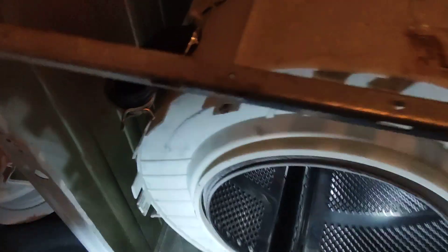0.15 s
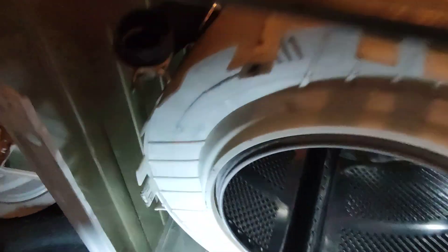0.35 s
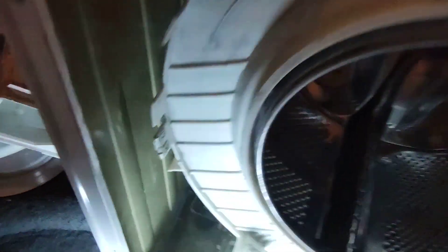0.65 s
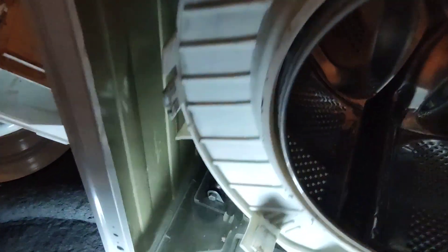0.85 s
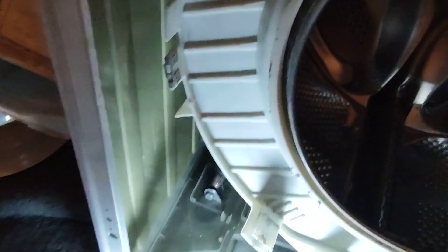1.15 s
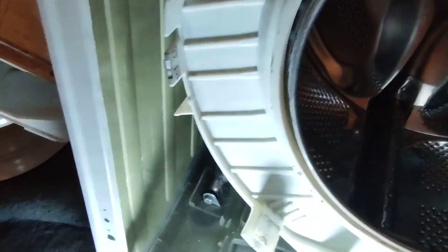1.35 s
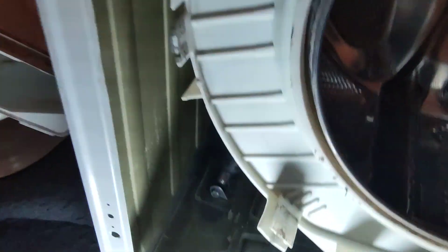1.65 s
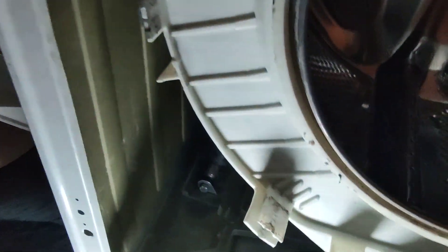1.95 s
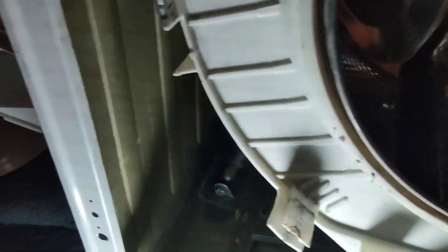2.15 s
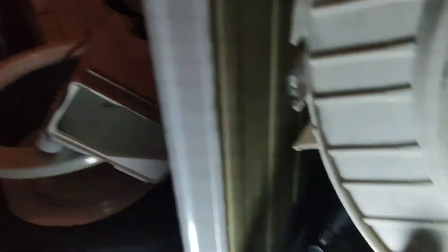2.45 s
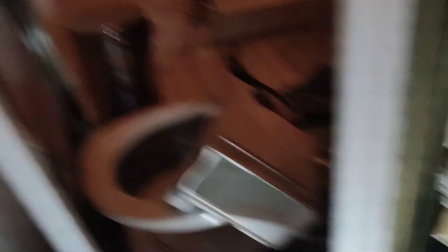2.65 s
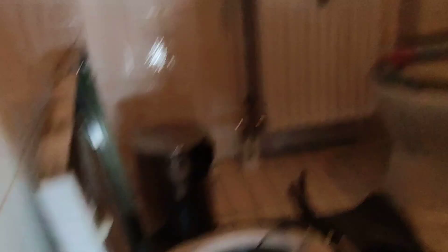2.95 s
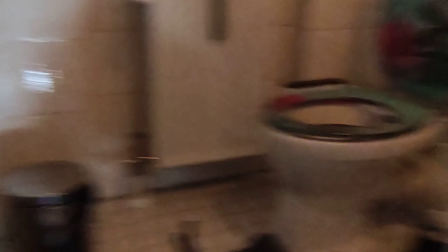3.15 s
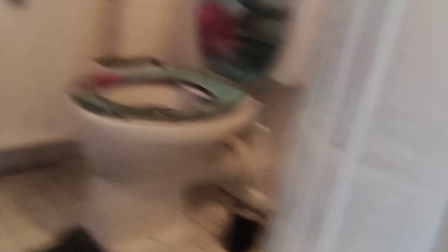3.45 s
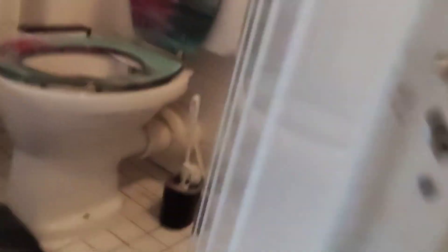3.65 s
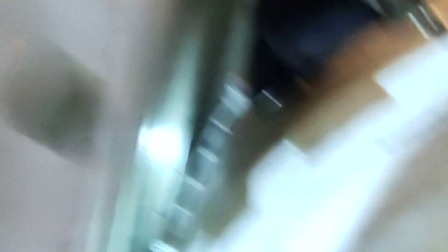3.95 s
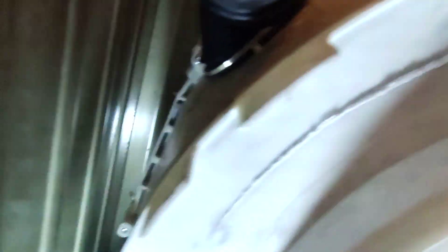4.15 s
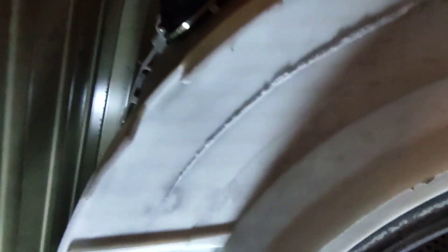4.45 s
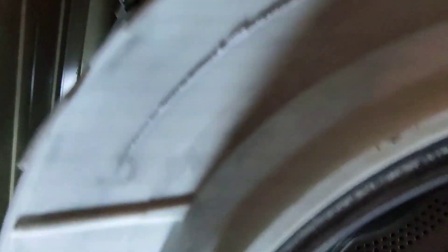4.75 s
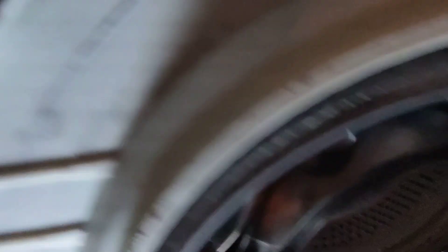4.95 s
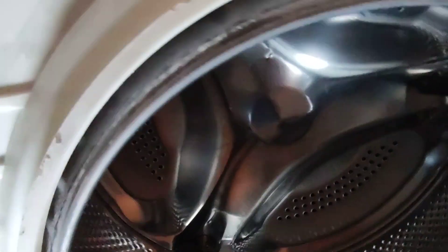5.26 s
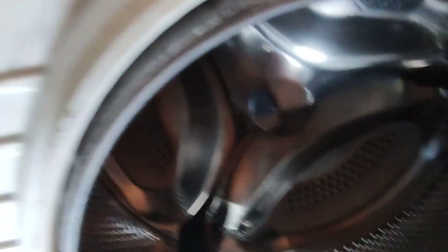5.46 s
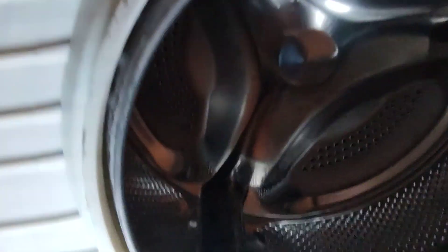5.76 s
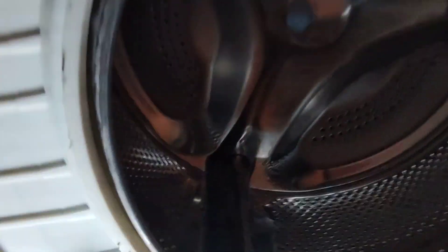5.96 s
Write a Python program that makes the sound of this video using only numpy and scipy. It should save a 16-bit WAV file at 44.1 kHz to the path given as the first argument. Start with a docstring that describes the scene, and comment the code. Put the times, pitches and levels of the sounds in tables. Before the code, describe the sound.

Close to the microphone, an opened washing machine is knocked and shoved in a small tiled bathroom. Two bright clicks come first, then a scraping, squealing cluster of hollow clunks, a double clunk, and a quieter gap. The loudest hard crack follows with a low puff of air, then looser knocks, a tiny metallic tinkle, and a final run of dull clunks. Short bright reverberation, soft rumble and hiss.

```python
"""Hard parts click on the steel cabinet of an opened washing machine, close by in a small tiled bathroom:
noisy chatter sets cabinet and tub ringing. The hollow tub clunks in damped swings and rocks in slow puffs
of air; random slips make scrapes, faint hissing swells (perhaps a sleeve rustling) and judder, narrow noise
makes squeals, and a small loose piece tinkles. A short, bright noise tail is the room, over rumble and hiss.
Table levels come before the layer and mix gains."""
import sys
import numpy as np
from scipy import signal
from scipy.fft import rfft, irfft
from scipy.io import wavfile

SR = 44100
rng = np.random.default_rng(int(sys.argv[2]) if len(sys.argv) > 2 else 0)


def generate_wav(signal):
    """Clip the signal to [-1, 1] and save it as 16-bit WAV at the path in sys.argv[1]."""
    frames = np.transpose(np.atleast_2d(signal))
    scaled = np.clip(frames, -1, 1) * 32767
    pcm = np.round(scaled).astype(np.int16)
    wavfile.write(sys.argv[1], SR, pcm)


N = 268877
SIZE = 32768  # samples in one short sound or response
T, HZ = np.arange(SIZE) / SR, np.fft.rfftfreq(SIZE, 1 / SR)

# spectrum of surfaces touching: (frequency [Hz], level [dB])
CONTACT_SPECTRUM = [(40, 1), (300, -5), (800, -2.5), (1300, -2), (2100, 1), (3200, -3), (4800, -5.5),
                    (6200, -7.5), (7400, -8), (8400, -16), (10000, -23.5), (12500, -33.5), (16000, -33)]


def clicks(bass_hz=600, mid_hz=2300, treble_hz=7000, top_hz=12000, top_growth=2.0, part_db=6.0,
           part_octaves=0.47, ripple_db=3.0, ripple_hz=80, chatter_db=2, first_db=10, tub_db=-3):
    """Each hard contact chatters for milliseconds and sets cabinet, tub and room ringing."""
    # hard contacts: (time [s], energy [dB], bass [dB], treble [dB], pitch of the part [Hz],
    # chatter decay [s], room [dB], steel ring [dB], left over right [dB])
    contacts = [(.769, -7.5, -19, 4, 2900, 0.0017, -6.5, -18, 1),
                (0.9305, -2, -14, 7, 3080, 0.0029, -5.5, -31, 1.5),
                (1.353, -29.5, -19, 5, 2750, .01, 5, 0, -4), (1.398, -24, 21, 7, 5600, .008, -2, 1, -3),
                (1.474, -16.5, -4, 5.5, 1870, 0.006, 1, 4, -1.5),
                (1.836, -19.5, 2, -7, 2240, 0.0043, 6.5, 1.5, 1.5),
                (1.8508, -12, -3.5, 2.5, 4840, 0.027, 8.5, 8.5, 0),
                (2.226, -13, 7.5, -1.5, 2400, 0.0011, -1.5, -27, -0.5),
                (2.236, -6.5, 12, -24, 1510, 0.017, -2.5, -40, -0.5),
                (3.3876, -18, 0, 8.5, 1770, 0.0048, 4, 0.5, -0.5),
                (3.893, -15.5, 5, -5, 1420, .003, 2, -13, 0),
                (4.041, -24.5, -1.5, -17, 2060, 0.012, 9, -5, 0),
                (4.201, -5.5, -8.5, 0, 1700, 0.015, 0.5, 3, -4),
                (4.2048, 4, -9.5, 2.5, 2300, 0.0062, -2.5, -19, 5.5),
                (4.228, -8, 2.5, 4, 2880, 0.0067, 6, -25, -1.5),
                (4.4912, -31.5, 3, -16, 1730, 0.00092, 5, -17, -8),
                (4.526, -20.5, -10, -23, 850, 0.0033, 3.5, -24, 1),
                (4.69, -8, -6.5, -11, 2570, 0.0098, 5.5, -24, 0),
                (4.783, -17.5, 3.5, -5, 1440, 0.01, 5, -13, -2.5),
                (5.086, -14, -13, 5, 1960, 0.0095, 1, -6, -3), (5.14, -18, -24, 9, 7200, 0.016, -2, -7, 0),
                (5.661, -21, 2, 12, 1600, .014, -5, -21, -1),
                (5.706, -20, -8, -5, 1700, 0.0028, -3, -21, -2),
                (5.73, -16, -10, -2, 1480, 0.012, -1.5, -14, 0),
                (5.745, -18.5, -24, 1.5, 2050, 0.0044, -17, -25, -2),
                (5.827, -17, 2, 6.5, 2530, 0.011, -3, -22, 2),
                (5.971, -19.5, -16, -13, 2650, 0.0072, -15, -26, -2),
                (5.9983, -18, 19, -17, 795, 0.0018, -26, -25, 4)]
    out, hollow = np.zeros((2, N)), amp(tub_db) * tub()
    for s, db, bass_db, treble_db, hz, chatter_s, room_db, ring_db, pan_db in contacts:
        # the treble tilt grows towards the top
        tilt = [(bass_hz, bass_db), (mid_hz, 0), (treble_hz, treble_db), (top_hz, top_growth * treble_db)]
        hardness = read(tilt, HZ)
        # the small part has one main resonance among many irregular ones
        part = part_db / (1 + (np.log2((HZ + 1) / hz) / part_octaves) ** 2)
        ripple = ripple_db * np.interp(HZ / ripple_hz, np.arange(len(HZ)), rng.standard_normal(len(HZ)))
        tone = unit(colour(read(CONTACT_SPECTRUM, HZ) + hardness + part + ripple))

        chatter = np.tanh(pair(SIZE)) * uneven(SIZE, chatter_db, 0.00096) * np.exp(-T / chatter_s)
        # the first impact reaches each port within 16 samples
        chatter[[0, 1], rng.integers(0, 16, size=2)] += amp(first_db)
        crack = unit(convolve(chatter, tone))
        tail = amp(room_db) * convolve(room(), tone)
        sound = crack + convolve(crack, hollow) + tail + amp(ring_db) * steel()
        pan = amp([[pan_db / 2], [-pan_db / 2]])
        add(out, s, amp(db) * pan * sound)
    return out


def steel(t60=0.52, prompt_t60=0.18, prompt_db=6, spot_db=3):
    """The cabinet's ring: each struck spot favours other modes; a strong early decay leaves a longer ring."""
    # modes of the steel cabinet: (frequency [Hz], level [dB])
    cabinet_modes = [(1041, -6), (1410, -7), (1782, -4), (2020, -4), (2143, -3), (2186, -3), (2598, -1),
                     (2810, -3), (2880, -1), (3063, -3), (3262, -2), (3391, 0), (3596, -2), (3865, 0),
                     (4301, -7), (4490, -7), (4651, -4), (5010, -4), (5213, 1), (5625, -7), (5760, -7),
                     (5885, -4), (6165, -5), (6514, -8), (6896, -8), (7255, -4), (7637, -5)]
    ring = np.zeros((2, SIZE))
    for hz, db in cabinet_modes:
        gain = amp(db + spot_db * rng.standard_normal())
        ring += gain * np.sin(2 * np.pi * (hz * T + rng.random((2, 1))))
    decay = amp(-60 * T / t60) + amp(prompt_db - 60 * T / prompt_t60)
    return unit(ring * decay)


def clunks(room_db=-6, level_db=-2, contact_cycles=0.21):
    """The struck wall swings a few times, the whole tub jolts, and both set its hollow ringing."""
    # dull blows on the tub: (time [s], energy [dB], pitch of the struck wall [Hz],
    # thump of the whole tub [dB], tub ring [dB])
    blows = [(1.25, -14.5, 520, -0.5, -3.5), (1.352, -21, 307, -28, 13), (1.398, -12, 503, -13, 0),
             (1.47, -9.5, 386, -26, 3), (1.519, -18.5, 222.6, -23.5, 11.5), (1.848, -9.5, 177, -27, 0),
             (1.869, -7, 365, -10.5, 4), (1.88, -10.5, 367, -23, 4.5), (1.883, -7.5, 524, -24, -10),
             (1.906, -7.5, 164, -10, -23), (2.204, -4.5, 99.3, -27, 5), (2.229, -6.5, 379, 6, -3),
             (2.231, -10, 215, -11.5, 2.5), (2.241, -10, 845, -15, -12), (3.431, -17, 205, -25, -24),
             (3.771, -18.5, 72.5, -5, -21), (4.06, -24, 343, -15, 14), (4.128, -16, 364, -0.5, 5),
             (4.193, -3, 57, -9.5, -11), (4.21, -13, 344, -2, -3.5), (4.492, -22.5, 235, -6.5, 14),
             (4.523, -21, 710, 3.5, -4), (4.573, -10, 220, -10, -1), (4.576, -23, 624, -8, -2),
             (4.59, -10, 55, -17, -14), (4.705, -27, 540, -1.5, 17), (4.805, -12, 422, -21, 2.5),
             (4.821, -18, 580, 3.5, 11), (4.835, -15, 261, 4.5, 8), (5.782, -24, 470, 4.5, 6),
             (5.884, -23, 400, -6, 12.5), (5.924, -10, 181, -20, 1.5), (5.955, -11.5, 419, -18, -5),
             (5.98, -19, 640, 9, -3), (6.0, -16.5, 294, -6, 10.5), (6.071, -24, 114, -29, 15)]
    # spectrum of a dull blow: (frequency [Hz], level [dB])
    dull_spectrum = [(20, -2), (60, 13.5), (550, 6.5), (800, 4.5), (1300, -5), (3000, -20), (9000, -75)]
    wall_cycles = 2.88  # the wall dies away within a few swings, whatever its pitch
    thump_hz, thump_cycles = 106, 0.86
    out, dull, hollow = np.zeros((2, N)), colour(read(dull_spectrum, HZ)), tub()
    thump = unit(convolve(swing(thump_hz, thump_cycles, contact_cycles), dull))
    for s, db, hz, thump_db, ring_db in blows:
        wall = unit(convolve(swing(hz, wall_cycles, contact_cycles), dull))
        blow = wall + amp(thump_db) * thump
        echo = amp(room_db) * np.linalg.norm(blow) * unit(convolve(blow, room()))
        ring = amp(ring_db) * convolve(blow, hollow)
        add(out, s, amp(db + level_db) * (blow + ring + echo))
    return out


def swing(hz, cycles, contact_cycles):
    """A damped swing that builds up over the contact; both times are counted in cycles of its pitch."""
    build = 1 - np.exp(-T * hz / contact_cycles)
    return np.sin(2 * np.pi * hz * T) * np.exp(-T * hz / cycles) * build


def tub():
    """The hollow tub's answer to a push; each mode peaks at its own level."""
    # modes of the tub: (frequency [Hz], peak gain [dB], t60 [s])
    tub_modes = [(69, 2, .4), (96.5, 10, .75), (113, 1, .5), (167, 4, .7), (210, 5, .45), (283, 2, .45),
                 (349.5, 8, .8), (410, 3, .6), (507, 4, .35), (558, 2, .35), (650, 4, .35), (732, 4, .45),
                 (1041, 12, .45)]
    response = np.zeros(SIZE)
    for hz, db, t60 in tub_modes:
        peak_scale = 2 * np.log(1000) / (t60 * SR)  # evens out the gain of short and long modes
        response += peak_scale * amp(db - 60 * T / t60) * np.cos(2 * np.pi * hz * T)
    return response


def tinks(room_db=-5):
    """A small loose metal piece is tapped and rings briefly with a few clear modes."""
    # taps: (time [s], energy [dB])
    taps = [(5.087, -15.5), (5.15, -30)]
    # modes of the piece: (frequency [Hz], level [dB], t60 [s])
    piece_modes = [(2520, -2, 0.15), (3470, -4, 0.2), (4124, -14, 0.24), (4872, -3, 0.13)]
    out = np.zeros((2, N))
    for s, energy_db in taps:
        ring = np.zeros((2, SIZE))
        for hz, db, t60 in piece_modes:
            ring += amp(db - 60 * T / t60) * np.sin(2 * np.pi * (hz * T + rng.random((2, 1))))
        ring = unit(ring)
        tail = amp(room_db) * unit(convolve(ring, room()))
        add(out, s, amp(energy_db) * (ring + tail))
    return out


def rubbing(slips_per_s=2500, spread_db=2.0, split_hz=4000, room_db=0, level_db=-4,
            rise_share=0.31, release_s=0.11):
    """Surfaces rub: tiny slips of uneven size make scrapes on the cabinet and faint, slow, hissing swells,
    perhaps a sleeve rustling."""
    # strokes: (start [s], length [s], level [dB], treble [dB], steel ring [dB])
    rubs = [(0.153, 0.68, -59.5, -0.5, -30), (1.188, 0.096, -59, -3, -4.5), (1.308, 0.091, -61, 9, 2.5),
            (1.495, 0.5, -57, -3.5, -21), (2.463, 0.64, -62, 2.5, -16), (4.003, 0.2, -49.5, -24, -29),
            (4.407, 0.21, -50.5, -28, -37), (5.344, 0.26, -59, -0.5, -27), (5.598, 0.13, -54, 8, -22),
            (5.886, 0.027, -46.5, 0, -25), (5.975, 0.17, -72, -6, -10)]
    starts, lengths, db, treble_db, ring_db = np.transpose(rubs)
    body = strokes(starts, lengths, db, rise_share, release_s)
    treble = strokes(starts, lengths, db + treble_db, rise_share, release_s)
    ring = strokes(starts, lengths, db + ring_db, rise_share, release_s)

    sizes = amp(spread_db * np.minimum(rng.exponential(1, N), 4))
    slips = (rng.random(N) < slips_per_s / SR) * sizes
    slips = slips * uneven(N, spread_db=1.5, hold_s=0.0046)  # the slips come in clumps
    slips = np.sqrt(N) * unit(slips * rng.standard_normal((2, N))) * amp(level_db)

    grit = convolve(slips, unit(colour(read(CONTACT_SPECTRUM, HZ))))
    low = signal.sosfilt(signal.butter(1, split_hz, fs=SR, output="sos"), grit)
    rub = body * low + treble * (grit - low) + convolve(ring * slips, steel())
    return rub + amp(room_db) * convolve(rub, room())


def judder(slips_per_s=260, level_db=-1, tub_db=-5, room_db=-5, rise_share=0.26, release_s=0.07):
    """A shove drags the tub over its supports: slow, soft slips push on its wall one after another."""
    # shoves: (start [s], length [s], level [dB])
    shoves = [(0.53, 0.51, -67.5), (1.222, 0.038, -49), (1.326, .22, -51.5), (1.836, 0.075, -40),
              (1.96, .16, -69), (3.9, 0.35, -59), (4.056, 0.16, -55), (4.466, 0.12, -48.5), (4.7, .15, -52),
              (5.596, 0.25, -58), (5.876, 0.1, -45.5), (5.98, .12, -56)]
    # spectrum of the pushed wall: (frequency [Hz], level [dB])
    wall_spectrum = [(20, -31), (70, -7), (130, -18.5), (220, 0), (380, -2), (560, -11), (720, -14.5),
                     (900, -13.5), (1500, -35.5), (4000, -61)]
    slips = (rng.random(N) < slips_per_s / SR) * rng.uniform(-0.93, 1, N)
    slips = np.sqrt(N) * unit(slips)
    slips = slips * amp(level_db) * strokes(*np.transpose(shoves), rise_share, release_s)
    wall = convolve(slips, unit(colour(read(wall_spectrum, HZ))))
    return wall + amp(tub_db) * convolve(wall, tub()) + amp(room_db) * convolve(wall, room())


def strokes(starts, lengths, levels_db, rise_share, release_s):
    """Force of a series of strokes: each builds over a share of its length, holds, and dies away."""
    t, power = np.arange(N) / SR, np.zeros(N)
    for start, length, db in zip(starts, lengths, levels_db):
        rise = np.clip((t - start) / (rise_share * length), 0, 1)
        release = np.exp(-np.clip((t - start - length) / release_s, 0, 20))
        power += (amp(db) * rise * release) ** 2
    return np.sqrt(power)


def squeals():
    """Rubbed metal squeals thinly: slips lock onto one resonance, a narrow noise that swells and fades."""
    # squeals: (time of the loudest point [s], half length [s], frequency [Hz], width [Hz], level [dB])
    squeal_list = [(1.273, 0.056, 5780, 50, -70), (1.276, 0.028, 1390, 14, -61),
                   (1.291, 0.049, 2680, 31, -62), (1.298, 0.07, 3420, 14, -60),
                   (1.341, 0.026, 7450, 60, -71), (1.376, 0.053, 4910, 67, -56),
                   (1.383, 0.058, 5570, 80, -60), (1.41, 0.028, 6350, 60, -61),
                   (1.505, 0.036, 3900, 13, -50.5), (1.915, 0.052, 5160, 28, -49),
                   (4.552, 0.052, 6690, 64, -55), (4.641, 0.047, 2780, 330, -51)]
    out, middle_s = np.zeros((2, N)), T[-1] / 2
    for s, half_s, hz, width_hz, db in squeal_list:
        tone = irfft(rfft(pair(SIZE)) / (1 + ((HZ - hz) / width_hz) ** 2))
        swell = np.exp(-((T - middle_s) / half_s) ** 2)
        add(out, s - middle_s, amp(db) * np.linalg.norm(swell) * unit(tone * swell))
    return out


def sways():
    """The rocking tub and the moving hand push slow puffs of air past the microphone: damped slow sines."""
    # swings of air pressure: (time [s], level before rise and decay [dB], frequency [Hz], rise [s], decay [s])
    puffs = [(2.197, -31.5, 21, 0.015, 0.36), (4.045, -33, 20, 0.039, 0.21), (4.161, -2, 7.75, 0.23, 0.078),
             (5.176, -43, 14.2, 0.0039, 0.19)]
    out, t = np.zeros((2, N)), np.arange(2 * SR) / SR
    for s, db, hz, rise_s, decay_s in puffs:
        shape = (1 - np.exp(-t / rise_s)) * np.exp(-t / decay_s)
        add(out, s, -amp(db) * np.sin(2 * np.pi * hz * t) * shape)
    return out


def room(build_s=0.0019):
    """The tail of the tiled room from one spot: noise whose bands each die at their own speed."""
    # decay of the room: (frequency [Hz], t60 [s])
    room_t60 = [(60, 0.92), (250, 0.74), (800, 0.41), (2500, 0.41), (5000, 0.42), (8000, .3), (15000, 0.17)]
    hz, t, z = signal.stft(pair(SIZE), SR, nperseg=256)
    decay = amp(-60 * t / read(room_t60, hz)[:, None])
    tail = signal.istft(z * decay, SR, nperseg=256)[1][:, :SIZE]
    return unit(tail * (1 - np.exp(-T / build_s)))


def hush(level_db=-56.5):
    """Quiet room rumble and microphone hiss: steady coloured noise."""
    # spectrum of the background: (frequency [Hz], level [dB])
    hush_spectrum = [(6, 8), (14, -5), (30, -1), (60, -13), (100, -9), (150, -17), (280, -20.5),
                     (600, -24.5), (1200, -25.5), (2000, -26), (3300, -31.5), (7400, -30.5), (9500, -36),
                     (15800, -35.5)]
    gain = amp(read(hush_spectrum, np.fft.rfftfreq(N, 1 / SR)))
    noise = irfft(rfft(pair(N)) * gain, N)
    return amp(level_db) * np.sqrt(N) * unit(noise)


def pair(count):
    """White noise at two microphone ports: alike in the bass, unrelated in the treble."""
    # likeness of the ports: (frequency [Hz], left-right correlation [0 to 1])
    likeness = [(60, 0.75), (250, 0.87), (500, 0.49), (1000, 0.0037), (16000, 0)]
    a, b = rfft(rng.standard_normal((2, count)))
    same = np.clip(read(likeness, np.fft.rfftfreq(count, 1 / SR)), -1, 1)
    return irfft(np.array([a, same * a + np.sqrt(1 - same ** 2) * b]), count)


def uneven(count, spread_db, hold_s):
    """A gain that wanders at random as two surfaces catch and let go."""
    steps = np.arange(count) / (SR * hold_s)
    return amp(spread_db * np.interp(steps, np.arange(count), rng.standard_normal(count)))


def amp(db):
    """Decibels to gain."""
    return 10 ** (np.asarray(db) / 20)


def read(points, hz):
    """Reads a table of (frequency [Hz], value) on a log-frequency axis."""
    f, value = np.transpose(points)
    return np.interp(np.log(hz + 1), np.log(f + 1), value)


def unit(x):
    """Scales to a mean energy of 1 a channel."""
    return x / np.sqrt(np.mean(np.sum(x ** 2, -1)) + 1e-20)


def add(mix, s, sound):
    """Mixes a sound in at time s."""
    part = mix[:, round(s * SR):][:, :sound.shape[-1]]
    part += sound[..., :part.shape[1]]


def convolve(x, response):
    """Passes x through a response, keeping its length."""
    return signal.fftconvolve(np.atleast_2d(x), np.atleast_2d(response), axes=1)[:, :x.shape[-1]]


def colour(db, size=2048):
    """Causal, minimum-phase response with the given gain over HZ."""
    log_gain = np.log(amp(np.r_[db, db[-2:0:-1]]))
    return irfft(np.exp(np.conj(signal.hilbert(log_gain)))[:len(HZ)])[:size]


def scene():
    """All the handling, heard by two ports; the left one catches less around 2 to 3 kHz."""
    # gain of the left port: (frequency [Hz], level [dB])
    left_gain = [(100, -0.5), (600, -1), (1100, -1.5), (2200, -11), (3300, -8), (5000, -7), (7500, 3),
                 (12000, -8.5)]
    left, right = clicks() + tinks() + clunks() + rubbing() + judder() + squeals()
    shaded = convolve(left, colour(read(left_gain, HZ)))[0]
    return np.array([shaded, right]) * amp(-1.0) + sways() + hush()


def record(dry, edge_hz=15900):
    """The recorder's band limit: a steep low-pass."""
    low_pass = signal.firwin(511, edge_hz, window=("kaiser", 9), fs=SR)
    return signal.oaconvolve(dry, low_pass[None], "same")


dry = scene()
out = record(dry)
generate_wav(out)
```